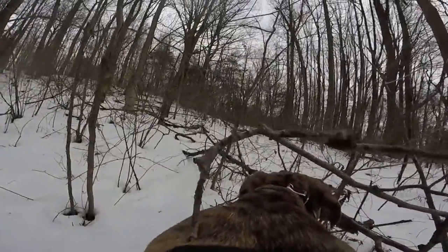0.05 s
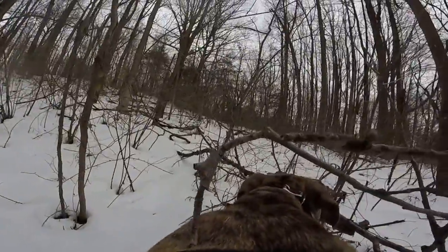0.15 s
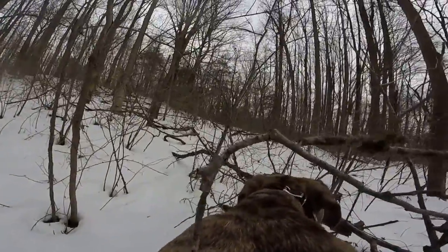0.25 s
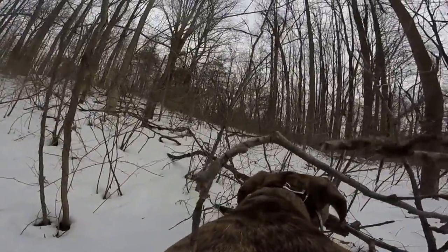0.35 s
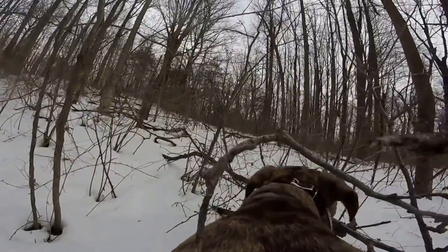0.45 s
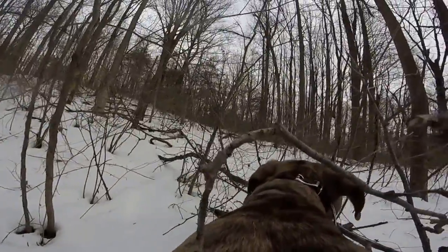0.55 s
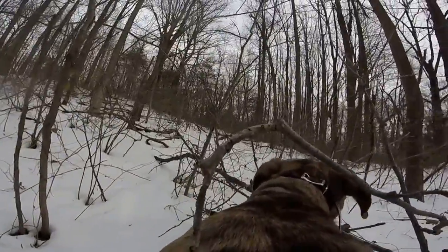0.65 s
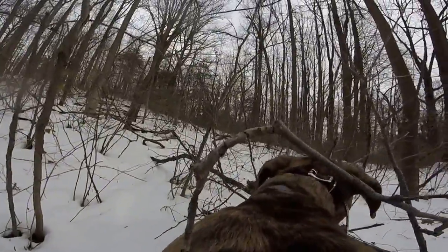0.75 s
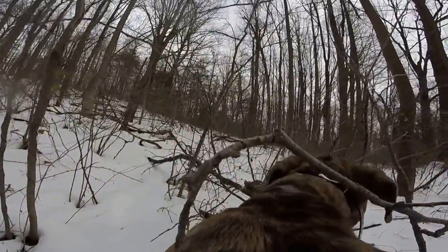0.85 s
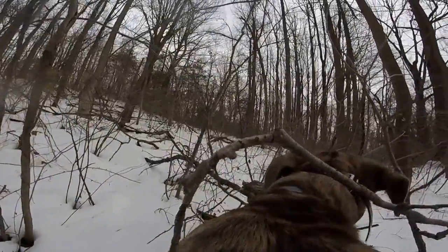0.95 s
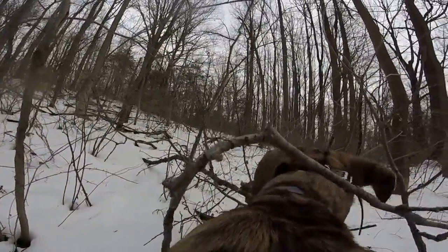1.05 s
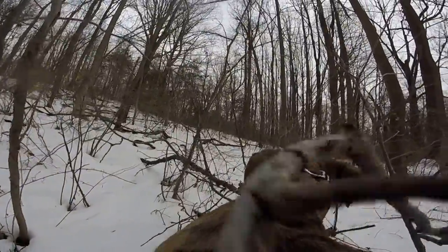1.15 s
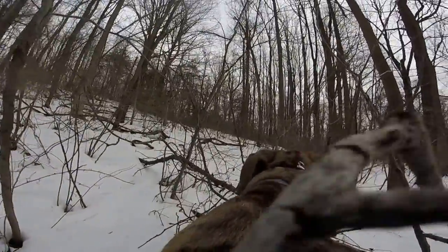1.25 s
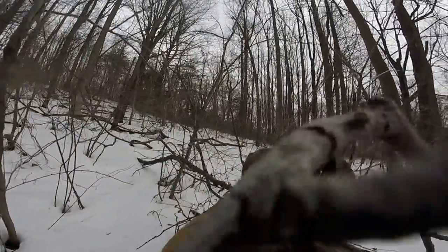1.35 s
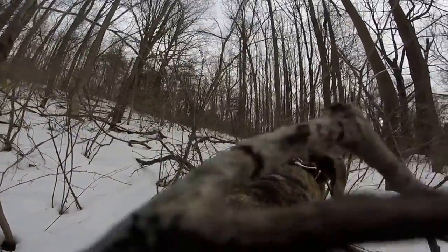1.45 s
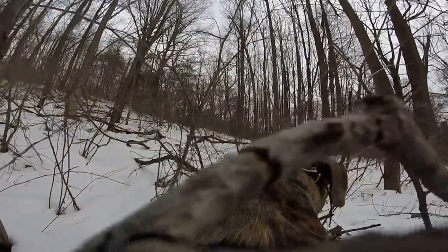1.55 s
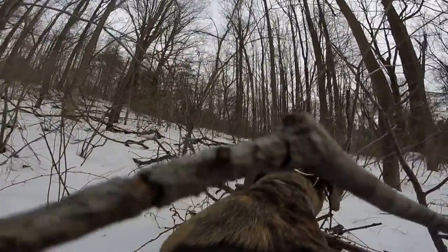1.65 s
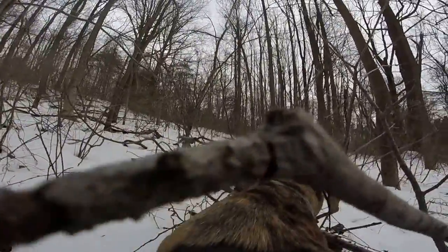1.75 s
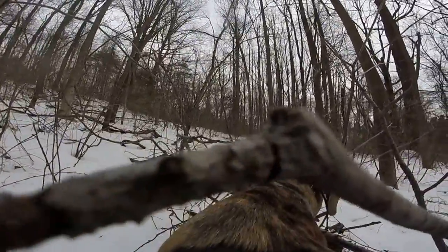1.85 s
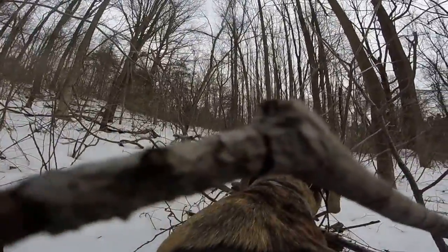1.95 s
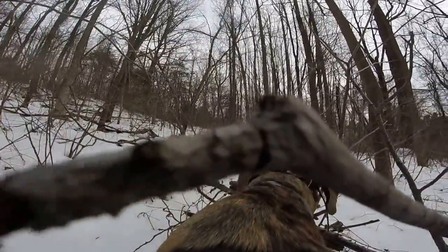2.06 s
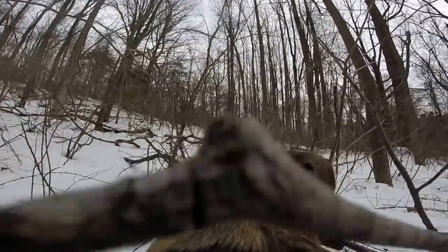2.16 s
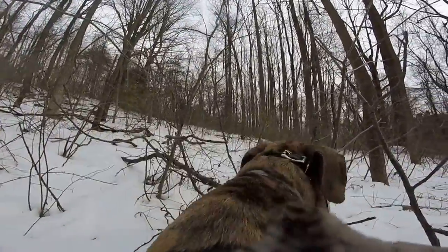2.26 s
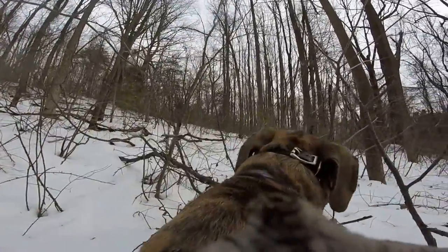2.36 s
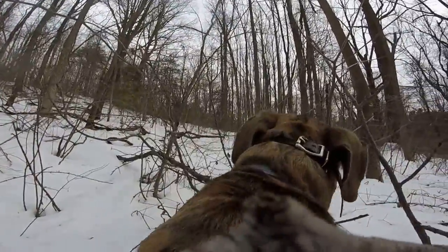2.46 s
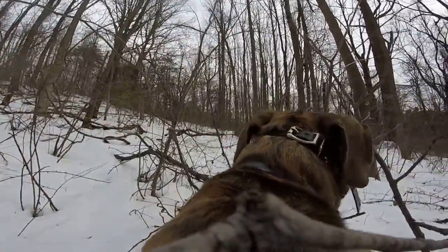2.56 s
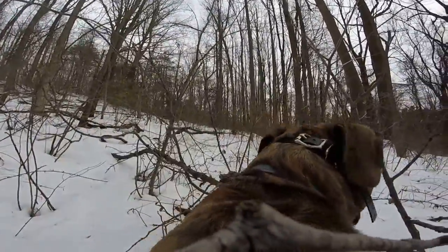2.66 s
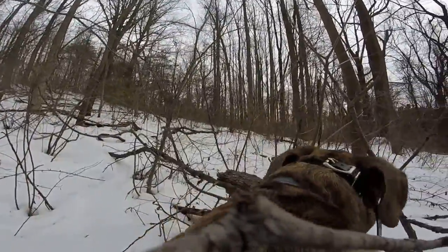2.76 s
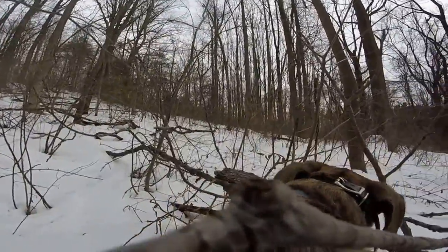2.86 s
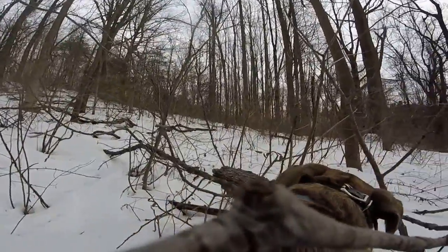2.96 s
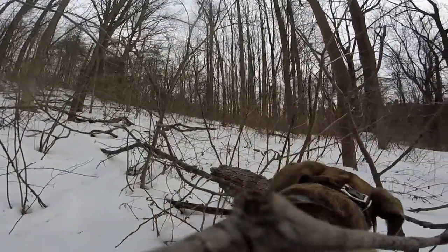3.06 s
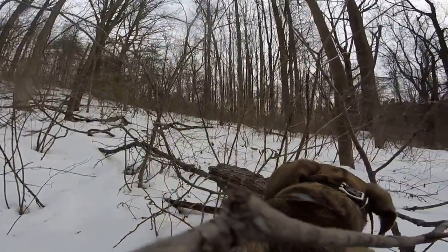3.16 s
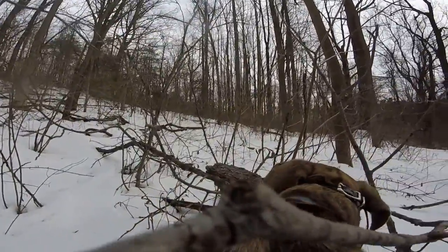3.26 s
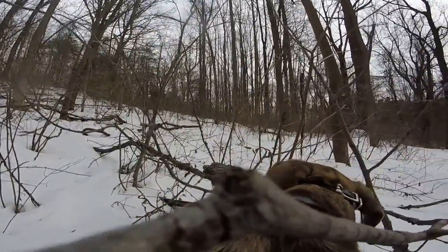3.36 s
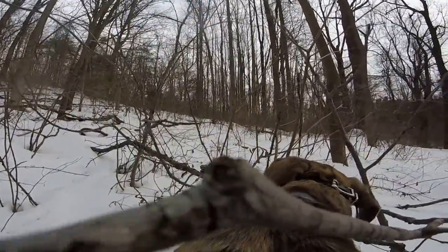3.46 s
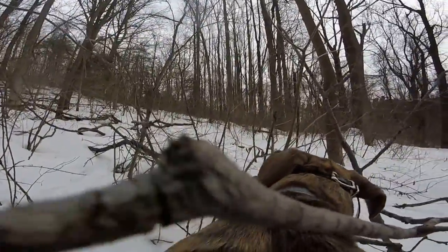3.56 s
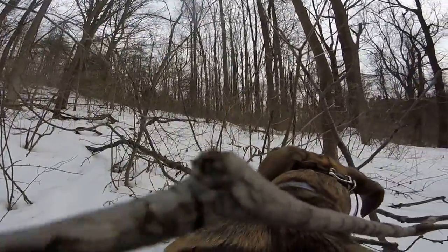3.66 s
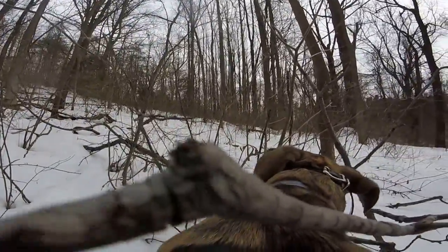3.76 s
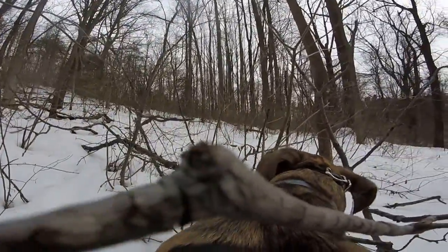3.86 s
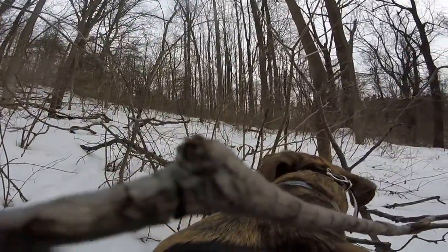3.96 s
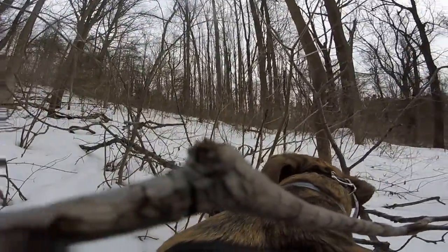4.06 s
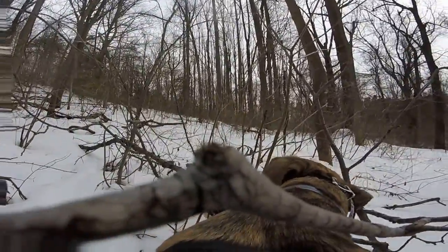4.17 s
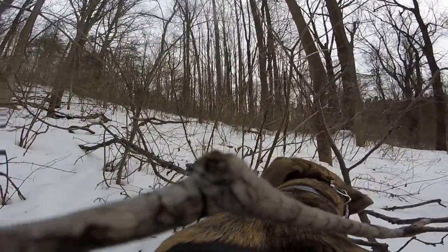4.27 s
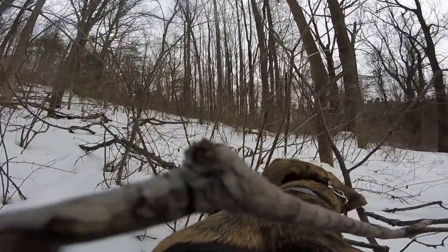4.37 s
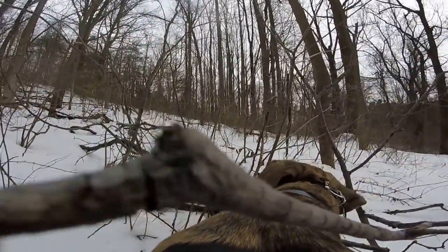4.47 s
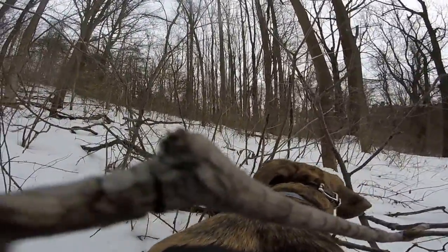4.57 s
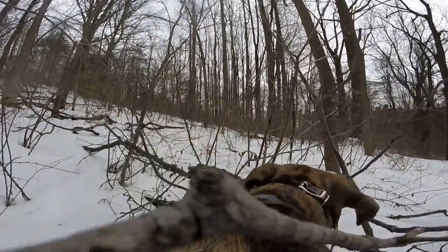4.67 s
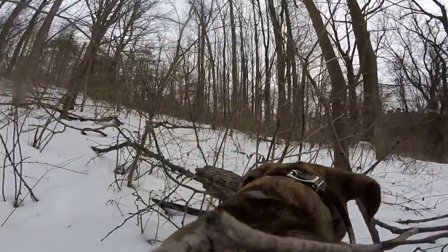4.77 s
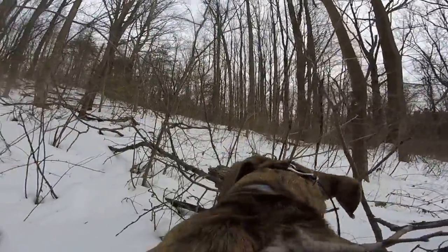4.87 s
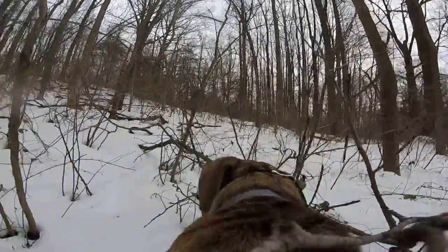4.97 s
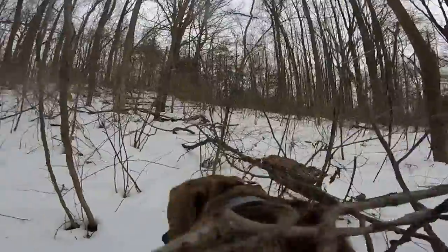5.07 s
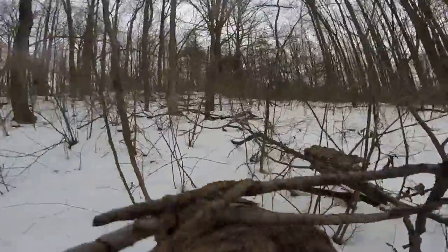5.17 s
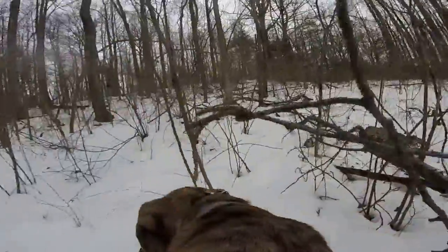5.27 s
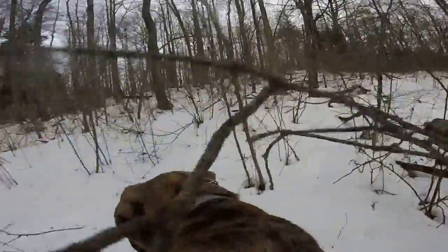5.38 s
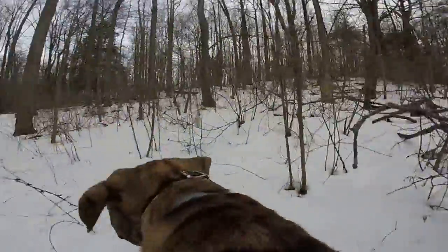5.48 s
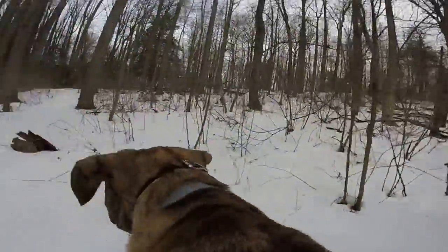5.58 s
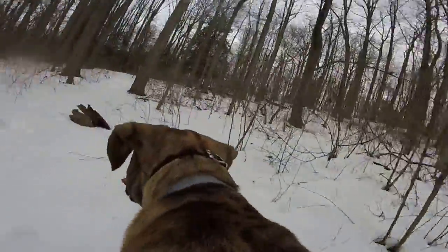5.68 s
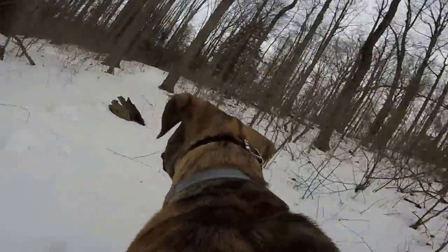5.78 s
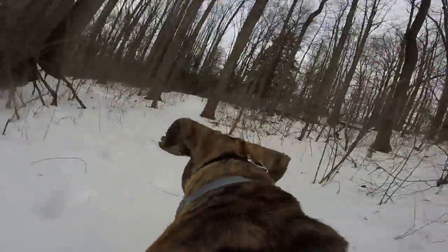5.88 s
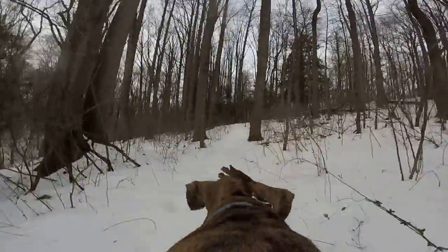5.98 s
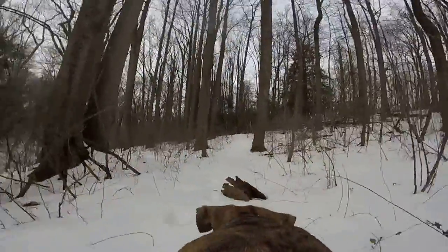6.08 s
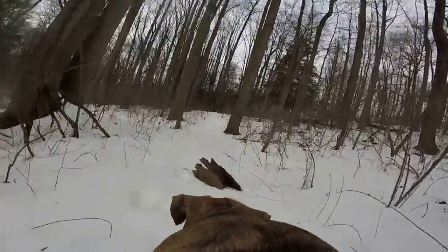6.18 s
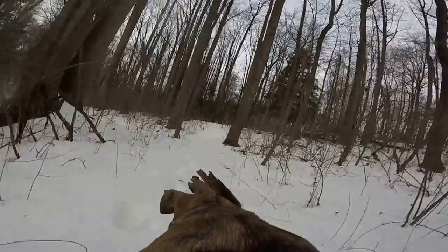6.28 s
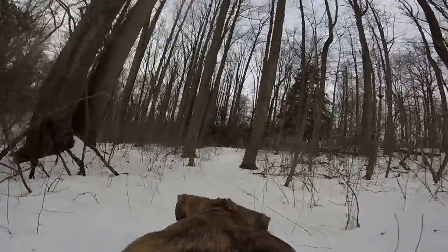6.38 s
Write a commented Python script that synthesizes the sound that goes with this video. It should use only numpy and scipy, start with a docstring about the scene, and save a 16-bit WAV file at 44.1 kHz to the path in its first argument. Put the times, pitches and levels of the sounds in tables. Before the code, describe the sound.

Dry branches knock, crack and rasp against a hard plastic case up close, in bursts with near-silent gaps, over faint low rumble.

```python
"""Dry twigs snap and knock on the plastic case of a camera strapped to a dog's back in snowy woods:
each knock is a short noise burst with brief ringing tones, heard through the case, close to the microphone.
A branch rasps across the case in stick-slip strokes made of random clicks that ring its hollows; it also
groans in gliding tones, sings at its tip and rings along its length. The harness rumbles as shaped low noise,
and a faint noise hiss sinks under the loudest contacts and creeps back."""
import sys
import numpy as np
from scipy import signal
from scipy.fft import rfft, irfft, next_fast_len
from scipy.io import wavfile
from scipy.ndimage import uniform_filter1d

SR = 44100
rng = np.random.default_rng(int(sys.argv[2]) if len(sys.argv) > 2 else 0)


def materialize(psi):
    """Save the field psi as 16-bit PCM at rate SR to the path in sys.argv[1].

    A 1-D psi becomes a single channel; in a 2-D psi each row is a channel.
    """
    bounded = np.clip(np.atleast_2d(psi).T, -1, 1)
    quanta = np.round(bounded * 32767).astype(np.int16)
    wavfile.write(sys.argv[1], SR, quanta)


N = 283298
TIME = np.arange(N) / SR
LOW_HZ, HIGH_HZ = 700, 4500  # borders between the low, middle and high bands of a contact

# colour of a sharp blow on the case: f/Hz, relative level per Hz/dB
BLOW = [(150, 5), (500, 0.5), (900, -2), (1700, 9), (3000, 8), (4000, -5), (5000, -14), (7800, -18),
        (9500, -29), (15000, -47.5)]


def gain_of(db):
    """Turns decibels into an amplitude factor."""
    return np.exp(np.asarray(db) * np.log(10) / 20)


def evened(x):
    """Scales a signal to rms 1."""
    return x / np.sqrt(np.mean(x ** 2) + 1e-20)


def add(mix, s, sound):
    """Mixes a sound in at time s in seconds, cut off at the end of the mix."""
    part = mix[max(round(s * SR), 0):][:len(sound)]
    part += sound[:len(part)]


def spectrum_gain(points, hz):
    """Spectrum as an amplitude factor, its decibels drawn straight between points on a log frequency axis."""
    f, db = np.transpose(points)
    return gain_of(np.interp(np.log(hz), np.log(f), db))


def response(points, band, size=4096):
    """Minimum-phase impulse response of energy 1: one band (0 low, 1 middle, 2 high) of a spectrum."""
    hz = np.fft.rfftfreq(size, 1 / SR) + 1
    low = 1 / (1 + (hz / LOW_HZ) ** 10)
    high = 1 / (1 + (HIGH_HZ / hz) ** 10)
    band_powers = [low / (1 + (110 / hz) ** 6), (1 - low) * (1 - high), high]
    gain = spectrum_gain(points, hz) * np.sqrt(band_powers[band])
    log_gain = np.log(np.maximum(gain / gain.max(), 1e-5))
    mirrored = np.r_[log_gain, log_gain[-2:0:-1]]
    # the Hilbert transform of the log gain gives the phase that puts the energy earliest
    causal_spectrum = np.exp(np.conj(signal.hilbert(mirrored)))
    taps = np.fft.ifft(causal_spectrum).real[:size // 2]
    return taps / np.linalg.norm(taps)


def ring(x, hz, width):
    """Sends a signal through one damped resonance, width in Hz, of gain about 1 at its peak."""
    r = np.exp(-np.pi * width / SR)
    return 2 * signal.lfilter([1 - r], [1, -r * np.exp(2j * np.pi * hz / SR)], x).real


def noise(points):
    """Steady noise of rms 1 with the given spectrum."""
    size = next_fast_len(N, real=True)
    hz = np.fft.rfftfreq(size, 1 / SR) + 1
    white = rfft(rng.standard_normal(size))
    return evened(irfft(white * spectrum_gain(points, hz), size)[:N])


def wander(per_s, count=2048):
    """Random drift of rms 1 within bounds: straight lines between per_s random points a second."""
    return evened(np.interp(TIME * per_s, np.arange(count), rng.uniform(-0.79, 1, count)))


def slips(per_s, spread_db):
    """Stick-slip releases: randomly timed clicks of uneven size and either sign, rms 1."""
    wait, size, sign = rng.random((16000, 3)).T
    at = (np.cumsum(-np.log(1 - wait)) * SR / per_s).astype(int)
    size_db = spread_db * np.minimum(-np.log(1 - size), 4)
    clicks = gain_of(size_db) * np.sign(sign - .5)
    return evened(np.bincount(at[at < N], clicks[at < N], N))


def stroke(t, start, length, grip_s=0.0056, let_go_s=0.0027, arch_db=5.5):
    """Pressure of one stroke: it catches quickly, presses hardest halfway, and lets go quickly."""
    along = np.clip((t - start) / length, 0, 1)
    edges = np.minimum(t - start, 0) / grip_s - np.maximum(t - start - length, 0) / let_go_s
    return np.exp(edges) * gain_of(arch_db * (np.sin(np.pi * along) - 1))


def harness(sway_db=-1):
    """The dog's body jolts the camera through its straps: low noise that swells and sinks."""
    # jolting over time: t/s, level before sway_db/dB
    jolts = [(0.0, -36), (0.09, -39.5), (1.3, -31), (1.6, -52), (2.95, -29.5), (3.07, -40.5), (3.9, -33),
             (4.02, -41.5), (4.97, -31.5), (5.11, -35.5), (5.38, -29), (5.4, -46.5), (6.42, -33.5)]
    # colour of the rumble: f/Hz, relative level per Hz/dB
    sway = [(5, -14), (15, 3.5), (30, 3), (48, -7.5), (75, -14), (110, -19), (200, -46.5), (500, -80.5)]
    s, db = np.transpose(jolts)
    return gain_of(np.interp(TIME, s, db) + sway_db) * noise(sway)


def hiss(contacts, hiss_db=-58, threshold_db=-24, release_db_per_s=16, depth=1.4, flicker_db=-0.1):
    """Faint steady noise that sinks by depth dB for each dB of contact above threshold and creeps back."""
    # colour of the hiss: f/Hz, relative level per Hz/dB
    hiss_colour = [(71, -23.5), (120, -13.5), (188, -5.5), (246, -16.5), (503, -17.5), (856, -22),
                   (1050, -23), (1620, -28), (2700, -25.5), (3660, -31), (7500, -37.5), (14200, -49),
                   (16000, -51.5)]
    power_db = 10 * np.log10(abs(uniform_filter1d(contacts ** 2, size=220)) + 1e-12)  # over 5 ms
    fall = TIME * release_db_per_s
    # the followed level jumps up with a contact, then falls at the release rate
    held_db = np.maximum.accumulate(power_db + fall) - fall
    over_db = np.maximum(held_db - threshold_db, 0)
    return noise(hiss_colour) * gain_of(hiss_db - depth * over_db + flicker_db * wander(25))


def rubbing():
    """Strength of low rub, rasp and fizz over time, powers summed from leaning, strokes, judder and bumps."""
    # branch resting on the case between strokes: t/s, pressure level/dB
    lean = [(0.45, -70), (0.8, -58), (1.22, -62), (1.33, -53), (1.55, -49), (2.08, -55.5), (2.4, -45),
            (2.52, -56), (3.0, -62.5), (3.2, -50), (3.45, -61), (4.38, -60), (4.8, -52), (5.3, -52),
            (5.39, -71), (5.92, -74), (6.25, -62.5), (6.42, -70.5)]
    # branch dragged across the case: start t/s, length/s, pressure level/dB, extra fizz level/dB
    strokes = [(0.889, 0.086, -48, -8), (1.074, 0.018, -37, -16), (1.329, 0.022, -32, 5),
               (1.374, 0.05, -36.5, 5.5), (1.439, .008, -46, 9), (1.474, 0.042, -35, -2),
               (1.598, 0.013, -36, -4), (1.66, .055, -43.5, 5.5), (1.686, 0.098, -34, -5),
               (1.825, 0.057, -36, 1), (2.181, 0.048, -39, -3), (2.251, 0.043, -20.5, 4.5),
               (2.29, 0.086, -31.5, 3), (2.565, 0.098, -36.5, 1), (2.699, 0.095, -40.5, -1),
               (2.858, 0.094, -40.5, 5), (3.216, 0.061, -39, 3.5), (3.31, 0.058, -39, -1.5),
               (3.553, 0.068, -31.5, -4), (4.14, .11, -43.5, -9), (4.461, 0.15, -37, -5.5),
               (4.638, 0.025, -37, -5.5), (4.736, 0.044, -26.5, -7), (4.802, 0.069, -38, 0),
               (4.873, 0.12, -30, 1), (5.225, 0.025, -29, -11), (5.352, 0.0093, -21.5, -6.5),
               (5.471, 0.052, -34.5, -24)]
    # soft bumps of fur and straps: t/s, pressure level/dB
    bumps = [(1.08, -46), (1.155, -40), (1.25, -27.5), (1.29, -22.5), (1.472, -23.5), (1.599, -29),
             (1.733, -25.5), (1.857, -21), (2.868, -28.5), (2.976, -30), (3.259, -32), (3.459, -26.5),
             (3.59, -22.5), (3.904, -22), (4.469, -22), (4.871, -24), (4.956, -21), (5.231, -32),
             (5.355, -35), (5.712, -48.5), (6.118, -43.5), (6.331, -41)]
    t = TIME[::32]
    # each touch: pressure, then rub, rasp and fizz levels in dB relative to it
    touches = [(gain_of(np.interp(t, *np.transpose(lean))), 2, 0, -17.5)]
    for start, length, db, fizz_db in strokes:
        touches.append((gain_of(db) * stroke(t, start, length), -2, 0, -12.5 + fizz_db))

    # the branch judders over the case in even slips that weaken ever faster
    judder_start_s, judder_count, period_s, slip_s = 3.58, 5, 0.0924, 0.067
    judder_db, judder_fade_db = -27, -11
    for k in range(judder_count):
        db = judder_db + judder_fade_db * (k / (judder_count - 1)) ** 2
        slip = stroke(t, judder_start_s + k * period_s, slip_s)
        touches.append((gain_of(db) * slip, -1, 0, -15))

    rise_s, fall_s = 0.0042, .017
    for s, db in bumps:
        push = np.exp(-abs(t - s) / np.where(t < s, rise_s, fall_s))
        touches.append((gain_of(db) * push, 0, -20, -40))

    power = sum((gain_of(bands)[:, None] * pressure) ** 2 for pressure, *bands in touches)
    return [np.interp(TIME, t, np.sqrt(p)) for p in power]


def scrapes(force, slips_per_s=1500, slip_db=4, grains_per_s=800, spread_db=4.5, grain_db=-14.5,
            shift_db=4.5, catch_db=2.5, catch_per_s=150, trim_db=(-1, -.5, -.5), thump_db=-1, drone_db=-30):
    """Ridges of bark catch and slip: dense clicks, and coarser grains that each ring a hollow of the case."""
    # colour of the case when rubbed: f/Hz, relative level per Hz/dB
    case = [(100, 8), (250, -1), (480, -9.5), (660, -14), (900, -8), (1400, -14), (1900, -11), (3000, -16),
            (4200, -24), (5000, -30), (7800, -37), (9000, -39), (12000, -50.5), (15500, -60.5)]
    # hollow resonances of the case: f/Hz, width/Hz, level relative to grain_db/dB
    hollows = [(292, 230, 3.5), (513, 150, 1), (922, 120, 4), (1179.6, 38, 4.5), (1660, 170, 0),
               (1850, 180, 4.5), (2018, 34, -1), (2521, 28, 3.5), (3115, 62, 4), (3710, 150, 2),
               (4071, 28, -2.5), (5280, 250, -2.5), (6137, 320, 4), (7700, 700, -2.5)]
    # colour of the push that shakes the camera: f/Hz, relative level per Hz/dB
    thump = [(30, -24), (55, -1), (78, 4.5), (100, -8), (140, -19), (300, -47.5), (900, -80)]
    friction = slips(slips_per_s, slip_db)
    for hz, width, db in hollows:
        grains = evened(ring(slips(grains_per_s, spread_db), hz, width))
        shifting_db = shift_db * wander(14)  # the contact point moves
        friction = friction + grains * gain_of(grain_db + db + shifting_db)
    friction = friction * gain_of(catch_db * wander(catch_per_s))

    out = gain_of(thump_db) * force[0] * noise(thump)  # the push also shakes the whole camera
    for band in range(3):
        rasp = evened(signal.oaconvolve(friction, response(case, band))[:N])
        out += gain_of(trim_db[band]) * rasp * force[band]

    # even a light, fizzy touch sets the mount droning
    drone = evened(ring(ring(rng.standard_normal(N), 915, 90), 1000, 160))
    touch = np.sqrt(np.sqrt(force[1] * force[2])) * np.tanh(force[2] / gain_of(-54.5))
    return out + gain_of(drone_db) * drone * touch


def snags(force, ticks_per_s=110, spread_db=4.0, tick_db=-12, splinter_db=-9):
    """Buds and side twigs catch on the case: sparse ticks that follow the strength of the rubbing."""
    ticks = slips(ticks_per_s, spread_db)
    out = np.zeros(N)
    for band, db in ((1, tick_db), (2, splinter_db)):
        out += gain_of(db) * signal.oaconvolve(ticks * force[band], response(BLOW, band))[:N]
    return out


def knocks(crack_s=0.0019, splinter_s=0.0014, chatter=0.76, attack_s=0.00072, ring_t60=0.016,
           partner_db=-7, size=9000):
    """A twig hits and chatters for milliseconds; twig and case ring briefly at a pitch set by the contact."""
    # twigs striking the case: t/s, level/dB, sharpness/dB (dry wood splinters, soft wood thuds), ring f/Hz
    impacts = [(0.713, -49.5, 0, 3000), (0.8903, -33.5, 15, 8000), (1.1471, -36.5, -19, 885),
               (1.2476, -31, -16, 1120), (1.2642, -10.5, -10, 983), (1.2759, -14, -3.5, 2710),
               (1.2926, -15, -13, 2370), (1.299, -18, -7, 1080), (1.3532, -7.5, -7, 2378),
               (1.4694, -17, -9, 1180), (1.469, -16.5, 14, 7620), (1.4771, -18, -3, 2300),
               (1.492, -18, -5, 1660), (1.603, -21, 2, 846), (1.7096, -24, 0.5, 883),
               (1.7318, -28, -15, 2540), (1.749, -47, 22, 3100), (1.7583, -28, -21, 950),
               (1.7875, -32, 5.5, 2470), (1.8284, -31.5, 4, 2580), (1.8447, -25.5, 10, 1160),
               (1.859, -22.5, 4, 2760), (1.8887, -27, -9, 3070), (1.9682, -27.5, -9, 3000),
               (1.976, -35, -17.5, 3040), (2.0054, -35, -6, 2260), (2.23, -30.5, 14.5, 1690),
               (2.2717, -18, 1.5, 2574), (2.3962, -35, 6, 2980), (2.7028, -29, -4, 2750),
               (2.7459, -30.5, 5.5, 920), (2.9776, -27, 12.5, 1150), (3.077, -37, 1.5, 1680),
               (3.4518, -30, 1.5, 1200), (3.546, -27, -15, 1140), (3.5904, -19.5, 10, 1176),
               (3.7142, -25.5, -2.5, 1840), (4.154, -38, 10, 1140), (4.463, -20, -11.5, 1123),
               (4.8665, -26, -6, 875), (4.9166, -25, -12, 910), (4.9366, -13.5, -4, 920),
               (4.9408, -12.5, -8.5, 846), (4.9466, -14.5, 1.5, 860), (4.9519, -12, -1.5, 880),
               (4.965, -20, -14, 910), (4.9998, -14.5, -3, 2570), (5.0076, -15, 1.5, 2990),
               (5.0171, -17, 7, 2980), (5.0505, -26, 13, 2400), (5.0848, -31, 21.5, 5170),
               (5.1026, -28, 14.5, 3220), (5.3203, -11.5, 0.5, 2290), (5.3265, -22.5, -1.5, 2370),
               (5.3528, -13, 7.5, 1770), (5.3678, -6, 1.5, 1740), (5.5068, -9, 7.5, 3032),
               (5.715, -45.5, -22, 949), (5.905, -49, -2, 830), (6.1193, -51, -17.5, 870)]
    # the mount rings on after every crack: f/Hz, t60/s, level relative to the crack/dB
    mount_modes = [(928, .13, -30), (1920, .08, -20), (1950, .18, -24), (3050, .06, -32)]
    thud_db, crack_db, splinter_db, ring_db = -14.5, -4, -14.5, 9  # relative to the knock's level
    thud_db_per_octave, twig_hz, thud_per_sharpness = -6.5, 1500, -.3  # a light twig rings high, thuds little
    out, t = np.zeros(N), np.arange(size) / SR
    colours = [response(BLOW, band) for band in range(3)]
    energy = np.sqrt(.005 * SR)  # a burst at 0 dB has the energy of 5 ms at rms 1
    mount = sum(gain_of(db - 60 * t / t60) * np.sin(2 * np.pi * hz * t) for hz, t60, db in mount_modes)

    for s, level, sharp, hz in impacts:
        thud = thud_db + thud_per_sharpness * sharp + thud_db_per_octave * np.log2(hz / twig_hz)
        parts = thud, crack_db, splinter_db + sharp
        for colour, db, decay in zip(colours, parts, (crack_s, crack_s, splinter_s)):
            # the fibres give way one after another, so the burst takes a moment to build
            contact = chatter * rng.standard_normal(size) * np.sqrt(t / decay) * np.exp(-t / decay)
            contact[0] += 1  # the first touch
            blow = signal.fftconvolve(contact, colour)[:size]
            add(out, s, gain_of(level + db) * energy * blow / np.linalg.norm(blow))

        # a crooked twig has weaker modes on either side of its main one
        partners = hz * rng.uniform([.68, 1.1], [.9, 1.32])
        passed = gain_of(partner_db) / (1 + (partners / 8500) ** 12)  # very high partners drop out
        modes = np.sin(2 * np.pi * hz * t) - passed @ np.sin(2 * np.pi * partners[:, None] * t)
        fade = gain_of(level + ring_db - 60 * t / ring_t60) * (1 - np.exp(-t / attack_s))
        add(out, s, fade * modes + gain_of(level + crack_db) * mount)
    return out


def groans(waver=0.079, overtone_db=-8):
    """The bent branch groans as it slides: low, unsteady gliding tones with one overtone."""
    # glides: start t/s, length/s, first f/Hz, last f/Hz (both before the waver), level/dB
    glides = [(1.099, 0.12, 151.1, 175, -45.5), (1.863, .1, 249.3, 145, -40.5)]
    out = np.zeros(N)
    for start, length, first_hz, last_hz, db in glides:
        glide_hz = np.interp(TIME, [start, start + length], [first_hz, last_hz])
        hz = glide_hz * (1 + waver * wander(120))
        phase = 2 * np.pi * np.cumsum(hz) / SR
        tone = evened(np.sin(phase) + gain_of(overtone_db) * np.sin(2 * phase))
        out += gain_of(db) * stroke(TIME, start, length) * tone
    return out


def squeal(fizz, start_s=1.31, length_s=.48, tip_hz=7750, width_hz=600, grains_per_s=700, spread_db=3,
           tip_db=-4):
    """A thin twig tip skates over the case and sings high: slips ring its resonance, scaled by the fizz."""
    grains = ring(ring(slips(grains_per_s, spread_db), tip_hz, width_hz), tip_hz, 3 * width_hz)
    return fizz * gain_of(tip_db) * evened(grains) * stroke(TIME, start_s, length_s)


def branch(rasp, start_s=2.55, length_s=1, grains_per_s=900, spread_db=3, branch_db=1):
    """The branch saws over the dog's back; slips of its bark set the modes along its length ringing."""
    # modes of the branch: f/Hz, width/Hz, level relative to the rasp before branch_db/dB
    branch_modes = [(900, 63, -3.5), (2630, 410, -4), (3080, 100, -9), (4010, 130, -12), (5040, 450, -12.5)]
    modes = np.zeros(N)
    for hz, width, db in branch_modes:
        grains = slips(grains_per_s, spread_db)
        modes += gain_of(db) * evened(ring(ring(grains, hz, width), hz, 3 * width))
    return gain_of(branch_db) * modes * rasp * stroke(TIME, start_s, length_s)


def scene():
    """Knocks, scrapes and groans reach the microphone through the case, over rumble and hiss."""
    force = rubbing()
    rub, rasp, fizz = force
    contacts = scrapes(force) + snags(force) + knocks() + groans() + squeal(fizz) + branch(rasp)
    return (harness() + hiss(contacts) + contacts)[None]


def record(dry, edge_hz=15600):
    """Anything beyond full scale overloads and is cut flat; then the treble is limited at edge_hz."""
    clipped = np.clip(dry, -1, 1)
    low_pass = signal.firwin(255, edge_hz, window=("kaiser", 9), fs=SR)
    return signal.oaconvolve(clipped, low_pass[None], "same")


dry = scene()
out = record(dry)
materialize(out)
```